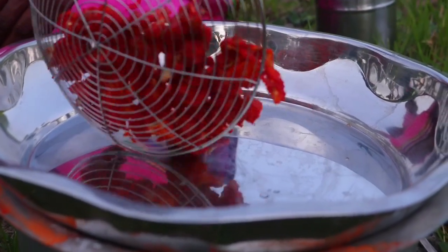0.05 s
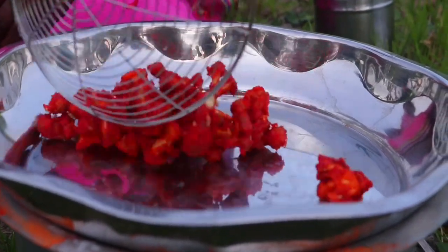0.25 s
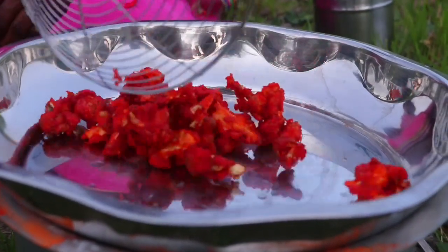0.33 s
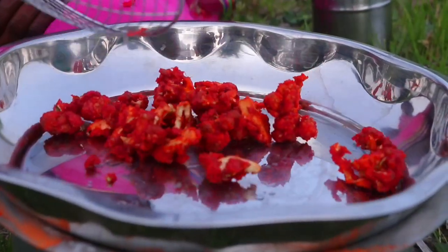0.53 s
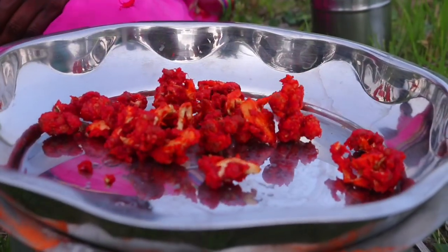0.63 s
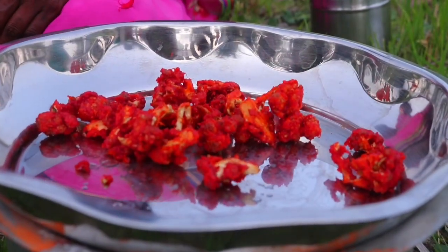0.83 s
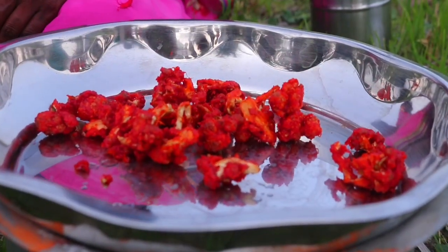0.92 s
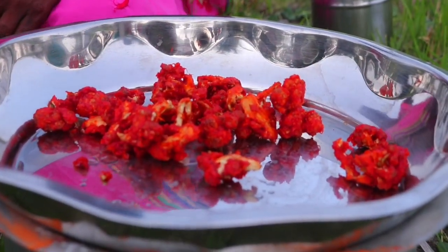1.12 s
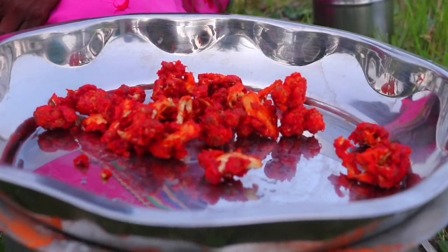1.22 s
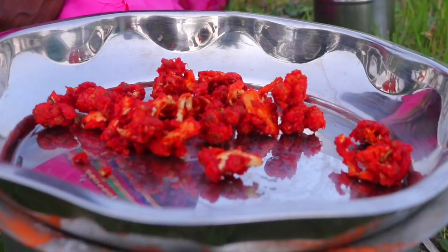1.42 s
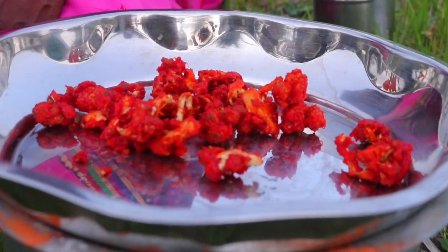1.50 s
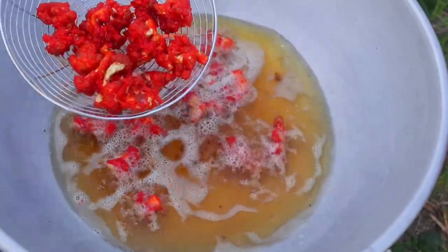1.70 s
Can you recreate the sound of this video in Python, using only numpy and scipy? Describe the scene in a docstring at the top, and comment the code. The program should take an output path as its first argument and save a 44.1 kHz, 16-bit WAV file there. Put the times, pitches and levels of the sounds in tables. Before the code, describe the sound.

Fried food tumbles onto a metal plate with thuds, clinks and a wire skimmer's jangle.

```python
"""Crisp fried pieces clatter onto a wide steel plate, tipped from a wire skimmer close to the microphone.
Their soft weight thuds on the plate, their crusts clink and scrape it into ringing, and the skimmer jangles.
Three small hollow knocks follow, the last one faint, over quiet outdoor air with a low hum.
At the very end the background cuts out briefly and returns as a louder hiss."""
import sys
import numpy as np
from scipy import signal
from scipy.fft import rfft, irfft, next_fast_len
from scipy.io import wavfile

SR = 44100
rng = np.random.default_rng(int(sys.argv[2]) if len(sys.argv) > 2 else 0)


def wrap_up_sound(samples):
    """Save the sound to the file named by the first command line argument, as 16-bit audio."""
    columns = np.atleast_2d(samples).T
    # keep every value between -1 and 1, then stretch to whole-number steps
    tamed = np.clip(columns, -1, 1)
    steps = np.round(tamed * 32767).astype(np.int16)
    wavfile.write(sys.argv[1], SR, steps)


N = 77175

# how alike the two channels are for nearby sounds (frequency [Hz], correlation [0-1])
NEAR_LIKENESS = [(100, 1), (600, 0.97), (1500, 0.79), (3000, 0.38), (6000, 0.0045), (15000, 0)]
# the same for the surrounding air and hiss (frequency [Hz], correlation [0-1])
AIR_LIKENESS = [(60, 0.65), (240, 0.89), (940, 0.13), (3740, 0.052), (14800, -0.0)]


def plate():
    """Hard crusts and tumbling crumbs drive the same ringing steel."""
    # crusts striking (time [s], strong modes [dB], dense modes [dB], treble [dB], crumbling time [s])
    clinks = [(0.001, -22.5, -25, -37, 0.1), (0.111, -28, -30, -34, 0.047),
              (0.152, -33, -33.5, -26.5, 0.044), (0.228, -14.5, -24.5, -25, 0.0016),
              (0.304, -13.5, -22, -23.5, 0.01), (0.328, -20, -15, -40, 0.014),
              (0.345, -6, -6, -8.5, 0.0091), (0.355, -10.5, -11.5, -11.5, 0.011),
              (0.369, -6, -19, -22, 0.012), (0.386, -21, -20.5, -23, 0.0097),
              (0.435, -16.5, -19, -16.5, 0.017), (0.457, -7.5, -11, -11.5, 0.015),
              (0.48, -29, -18.5, -16, 0.044), (0.553, -13.5, -25, -30, 0.017),
              (0.572, -21, -12, -15.5, 0.0043), (0.601, -17.5, -36, -24, 0.0043),
              (0.664, -48, -13, -10.5, 0.0043), (0.695, -18.5, -24, -22, 0.0087),
              (0.736, -20.5, -24.5, -22.5, 0.053), (0.754, -27.5, -28.5, -32, 0.0061),
              (0.824, -27.5, -30.5, -31.5, 0.0085), (0.922, -25.5, -25.5, -36.5, 0.0025)]
    # the plate's strong modes (frequency [Hz], level [dB], t60 [s])
    modes = [(540, -13, 0.2), (747, -1, 0.22), (1208, -3, 0.3), (1470, 1, 0.1), (1491, 5, 0.18),
             (1546, -6, 0.25), (1740, -1, 0.27), (1857, -6, .22), (1997, -8, 0.2), (2090, -4, 0.22),
             (2514, -5, 0.2), (2616, -9, .2), (2922, -4, 0.3), (2972, -3, .34), (3016, -4, 0.34),
             (3345, -6, 0.2), (3790, -8, .25), (4260, -2, 0.26), (6050, -7, .25)]
    # its dense, weaker modes (frequency [Hz], level per Hz [dB])
    body_spectrum = [(100, -54), (400, -1), (800, -2), (1050, -15), (1700, -3.5), (3000, -2.5), (4100, 0),
                     (5200, 0), (6200, -30), (8000, -12.5), (16000, -51)]
    # its bright top end (frequency [Hz], level per Hz [dB])
    treble_spectrum = [(100, -66), (3500, -43), (5300, 7), (6300, 6.5), (8000, 1), (10500, 3.5),
                       (13000, 2.5), (16000, 1.5)]
    body, treble = dense_ring(body_spectrum), dense_ring(treble_spectrum)
    tones = ring(modes, scatter_db=3)
    body_force, treble_force = np.zeros((2, N))
    for s, _, body_db, treble_db, crumble_s in clinks:
        touch = crust_contact(crumble_s)
        add(body_force, s, amp(body_db - 0.5) * touch)
        add(treble_force, s, amp(treble_db) * touch)
    tumble = crumbs()
    clang = amp(-6.5) * struck([row[:2] for row in clinks], modes, attack_s=0.0014, scatter_db=5.5)
    scraping = scrape(tumble, body, -6) + scrape(tumble, treble, -7.5) + scrape(tumble, tones, -8.5)
    return clang + drive(body_force, body) + drive(treble_force, treble) + scraping


def dense_ring(spectrum):
    """Countless steel modes after a short crack, each band dying at its own speed."""
    # ring time of the steel (frequency [Hz], t60 [s])
    decay = [(200, 0.036), (1500, 0.61), (4000, 0.14), (8000, 0.23), (15000, 0.22)]
    crack_db, crack_t60 = 3, 0.026
    hz, t, bands = signal.stft(noise(spectrum, NEAR_LIKENESS), SR, nperseg=256)
    fade = amp(-60 * t / along(decay, hz)[:, None]) + amp(crack_db - 60 * t / crack_t60)
    _, ringing = signal.istft(bands * fade, SR, nperseg=256)
    return ringing[:, :SR // 2] / np.sqrt(1 + amp(crack_db) ** 2)


def crust_contact(crumble_s):
    """Force of one crust: a sharp touch and a spray of tiny fractures."""
    t = clock()[:SR // 20]
    spray = rng.standard_normal(len(t)) ** 3 * np.exp(-t / crumble_s)
    force = amp(4.5) * spray / np.linalg.norm(spray)
    force[0] += 1  # the touch
    return force / np.linalg.norm(force)


def crumbs():
    """Force of the random tiny contacts of the sliding pieces."""
    # strength of the sliding and tumbling (time [s], level [dB])
    slide = [(0, -37), (0.1, -33.5), (0.21, -34.5), (0.25, -21.5), (0.3, -21), (0.36, -14), (0.41, -19.5),
             (0.47, -14.5), (0.52, -31.5), (0.6, -16.5), (0.7, -23.5), (0.77, -65), (0.81, -49),
             (0.95, -44), (1.0, -70)]
    contacts_per_s, spread_db = 1000, 5
    ticks = (rng.random(N) < contacts_per_s / SR) * rng.choice([-1, 1], N)
    return unit(ticks * amp(spread_db * rng.standard_normal(N))) * level(slide)


def under_heap(steel):
    """The growing heap muffles the plate's lower ringing."""
    # damping by the full heap (frequency [Hz], gain [dB])
    muffle = [(300, -9.5), (600, -1), (1050, -16.5), (1500, -5), (2300, -2.5), (3200, -2)]
    start_s, full_s = 0.48, 0.64
    load = np.clip((clock() - start_s) / (full_s - start_s), 0, 1)
    return (1 - load) * steel + load * filtered(steel, lambda hz: amp(along(muffle, hz)))


def landings():
    """The soft weight of each piece pushes the plate's low modes, with a dull puff."""
    # pieces landing (time [s], weight on the low modes [dB], puff [dB])
    thuds = [(0.008, -17.5, -43), (0.111, -21.5, -39), (0.152, -29, -41), (0.228, -1, -24),
             (0.248, -6.5, -18), (0.277, -9.5, -19), (0.307, -1.5, -15), (0.346, 0, -7), (0.366, -4.5, -11),
             (0.385, -12.5, 0), (0.415, -14, -13.5), (0.435, -35, -10.5), (0.456, -2.5, -8.5),
             (0.479, -6.5, -12), (0.489, -6, -22.5), (0.541, -26, -6.5), (0.593, -16.5, -14),
             (0.634, -19, -21), (0.687, -25.5, -22.5), (0.735, -17, -22), (0.75, -24, -21.5),
             (0.787, -33, -29.5), (0.866, -43, -24.5), (0.913, -43, -29)]
    # low modes of the loaded plate (frequency [Hz], level [dB], t60 [s])
    low_modes = [(137, -13.5, 0.11), (162.5, -7.5, 0.46), (208.8, 2, 0.082), (227, -9, 0.1),
                 (326.8, -12.5, 0.2), (573, -8.5, 0.065), (745, -20.5, 0.27), (1492, -19.5, 0.4)]
    # colour of the puff (frequency [Hz], level per Hz [dB])
    puff_spectrum = [(30, -50), (100, -29), (200, 3.5), (340, 6.5), (560, -3), (850, -5.5), (1500, -8.5),
                     (5000, -36)]
    attack_s, puff_t60, radiate_hz = 0.003, 0.055, 93
    boom, puff_envelope, t = np.zeros((2, N)), np.zeros(N), clock()[:SR // 2]
    rise = 1 - np.exp(-t / attack_s)
    for s, weight_db, puff_db in thuds:
        add(boom, s, amp(weight_db - 6.5) * rise * ring(low_modes, scatter_db=2.5))
        add(puff_envelope, s, amp(puff_db - 3 - 60 * t / puff_t60) * rise)
    low_cut = signal.butter(2, radiate_hz, "high", fs=SR, output="sos")  # the plate radiates little bass
    return signal.sosfilt(low_cut, boom + puff_envelope * noise(puff_spectrum, NEAR_LIKENESS))


def skimmer():
    """Jolts and sliding pieces set the wire basket ringing; at three jolts its wires also chatter."""
    # jolts of the basket (time [s], level [dB])
    jolts = [(0.346, -13.5), (0.366, -10.5), (0.385, -30), (0.457, -23.5), (0.481, -16.5), (0.572, -30),
             (0.602, -13), (0.664, -27.5), (0.754, -39)]
    # its modes (frequency [Hz], level [dB], t60 [s])
    modes = [(2329, 3, .2), (2377, 5, 0.22), (2430, -4, .15), (2721, -2, 0.3), (3140, -4, .27),
             (3219, -4, .22), (3300, -3, 0.24), (3551, -1, 0.33), (3844, -4, .18), (4459, -2, .28),
             (4639, -2, 0.2), (4762, 1, 0.22), (4904, .5, 0.23), (5045, -1, 0.14), (5281, 0, 0.18),
             (5367, -2, 0.16)]
    # bursts of wire chatter (time [s], level [dB])
    clashes = [(0.348, -20), (0.601, -8.5), (0.662, -27)]
    # colour of the chatter (frequency [Hz], level per Hz [dB])
    chatter_spectrum = [(1200, -10.5), (2100, -6), (2400, 10), (2900, 0), (4200, -11), (4950, 6),
                        (5600, -7), (9000, -12.5)]
    chatter_t60, envelope = 0.068, np.zeros(N)
    for s, db in clashes:
        add(envelope, s, amp(db - 60 * clock() / chatter_t60))
    wires = ring(modes, scatter_db=1.5)
    scraping = scrape(crumbs(), wires, -8)
    chatter = envelope * noise(chatter_spectrum, NEAR_LIKENESS)
    return scraping + chatter + struck(jolts, modes, attack_s=0.0006, scatter_db=2.5)


def knocks():
    """Light knocks ring something small and hollow."""
    # the knocks (time [s], level [dB])
    hits = [(0.795, -30), (1.059, -28.5), (1.543, -36)]
    # modes of the hollow body (frequency [Hz], level [dB], t60 [s])
    modes = [(244, -3, 0.009), (469.4, 0, 0.14), (535, -4, 0.16), (680, -12.5, 0.13), (716, -18, 0.11),
             (2330, -22, 0.036)]
    return struck(hits, modes, attack_s=0.0006)


def outdoor_air():
    """Quiet open air with a hum, a faint rustle and two low bumps of air or handling."""
    # steady air (frequency [Hz], level per Hz [dB])
    air_spectrum = [(15, -36), (30, -52), (70, 5.5), (110, 0.5), (200, -9), (480, -8), (900, -15.5),
                    (1500, -11.5), (2100, -15), (3500, -13), (7000, -18), (15000, -21)]
    # low rustle (frequency [Hz], level per Hz [dB])
    rustle_spectrum = [(40, -0.5), (120, 9), (300, -2), (600, -9), (2000, -21)]
    # its rise and fall (time [s], level [dB])
    rustle_levels = [(0, -40.5), (0.8, -40.5), (1.0, -58.5), (1.28, -54), (1.32, -40), (1.45, -47.5),
                     (1.67, -45)]
    # bumps at the microphone (time [s], level [dB])
    bumps = [(0.163, -23), (1.19, -32)]
    hum_hz, bump_hz, bump_t60 = 62, 74, 0.12
    air = amp(-43) * noise(air_spectrum, AIR_LIKENESS)
    hum = amp(-53.5) * unit(np.sin(2 * np.pi * hum_hz * clock()))
    rustle = level(rustle_levels) * noise(rustle_spectrum, NEAR_LIKENESS)
    thumps = pan(-19.5) * struck(bumps, [(bump_hz, 0, bump_t60)], attack_s=0.011)
    return air + hum + rustle + thumps


def background():
    """The outdoor air cuts out, and after a short gap a louder hiss takes over."""
    # closing hiss (frequency [Hz], level per Hz [dB])
    hiss_spectrum = [(35, -34), (60, 9.5), (148, -1.5), (309, -0.5), (448, 0.5), (695, -10), (2980, -3.5),
                     (15000, -10)]
    gap_from_s, gap_to_s = 1.68, 1.708
    fade_out = np.clip((gap_from_s - clock()) / 0.0023, 0, 1)
    fade_in = np.clip((clock() - gap_to_s) / 0.00051, 0, 1)
    return fade_out * outdoor_air() + fade_in * amp(-32.5) * noise(hiss_spectrum, AIR_LIKENESS)


def ring(modes, scatter_db):
    """Damped modes, starting at about rms 1; the higher ones reach the two sides out of step."""
    t, out = clock()[:SR // 2], 0
    for hz, db, t60 in modes:
        size, side = rng.standard_normal(2)
        phase = np.sign(side) * stereo_angle(NEAR_LIKENESS, hz) * np.array([[1], [-1]])
        out = out + amp(db + scatter_db * size - 60 * t / t60) * np.sin(2 * np.pi * hz * t + phase)
    return out / np.sqrt(np.sum(amp(np.array(modes)[:, 1]) ** 2) / 2)


def struck(hits, modes, attack_s, scatter_db=1):
    """An object rung by (s, dB) hits, each sharing its energy among the modes anew."""
    out, t = np.zeros((2, N)), clock()[:SR // 2]
    for s, db in hits:
        add(out, s, amp(db) * (1 - np.exp(-t / attack_s)) * ring(modes, scatter_db))
    return out


def drive(force, response):
    """A force played through an object's stereo impulse response."""
    return signal.fftconvolve(force[None], response, axes=1)[:, :N]


def scrape(force, response, db):
    """Tiny contacts keep an object ringing, about db above the level of their force."""
    return amp(db) * drive(force, response / np.linalg.norm(response[0]))


def noise(spectrum, likeness):
    """Coloured stereo noise of rms 1."""
    def mid_side_gains(hz):
        angle = stereo_angle(likeness, hz)
        return amp(along(spectrum, hz)) * [np.cos(angle), np.sin(angle)]
    mid, side = filtered(rng.standard_normal((2, N)), mid_side_gains)
    return unit(np.array([mid + side, mid - side]))


def stereo_angle(likeness, hz):
    """Mid-side angle that gives the channels their correlation."""
    return np.arccos(np.clip(along(likeness, hz), -1, 1)) / 2


def pan(db):
    """Channel gains for a left-minus-right level."""
    return amp(db * np.array([[.5], [-.5]]))


def filtered(x, response):
    """x through a gain that depends on frequency."""
    size = next_fast_len(N + SR // 4)
    return irfft(rfft(x, size) * response(np.fft.rfftfreq(size, 1 / SR)), size)[..., :N]


def amp(db):
    """Decibels to gain."""
    return 10 ** (np.asarray(db) / 20)


def unit(x):
    """Scale to rms 1."""
    return x / np.sqrt(np.mean(x ** 2) + 1e-20)


def along(points, hz):
    """Interpolate (Hz, value) points on a log axis."""
    freqs, values = np.transpose(points)
    return np.interp(np.log(hz + 1), np.log(freqs + 1), values)


def clock():
    """Time of every sample."""
    return np.arange(N) / SR


def level(rows):
    """Gain per sample from (s, dB) rows."""
    return amp(np.interp(clock(), *np.transpose(rows)))


def add(track, s, sound):
    """Mix a sound into a track at time s."""
    i = max(round(s * SR), 0)
    track[..., i:i + sound.shape[-1]] += sound[..., :N - i]


def scene():
    """Plate and skimmer close to the microphone, then the knocks, over the outdoor background."""
    # where the steel sits in the stereo image (frequency [Hz], left minus right [dB])
    balance = [(200, -3.5), (1500, 2.5), (2500, -1.5), (4000, -1), (5100, 8.5), (7000, -0.5), (10000, -3),
               (15000, -2.5)]
    steel = under_heap(plate()) + skimmer()
    steel = filtered(steel, lambda hz: pan(along(balance, hz)))
    return steel + landings() + knocks() + background()


def record(dry):
    """The loudest peaks are rounded off; nothing passes above the band limit."""
    ceiling, top_hz = 1.2, 15400
    rounded = dry / (1 + np.abs(dry / ceiling) ** 6) ** (1 / 6)
    return filtered(rounded, lambda hz: hz < top_hz)


dry = scene()
out = record(dry)
wrap_up_sound(out)
```